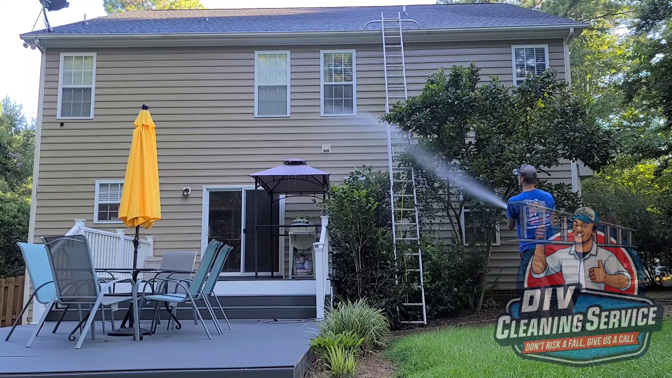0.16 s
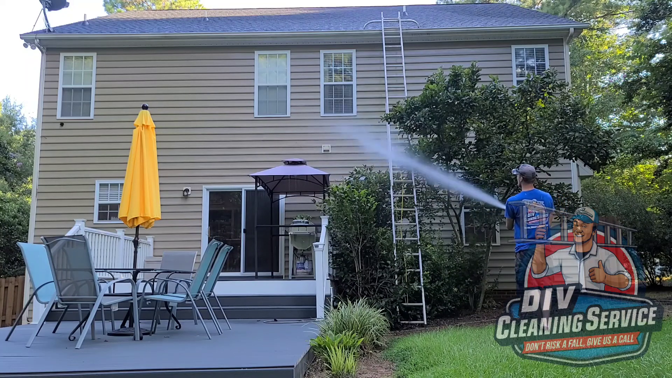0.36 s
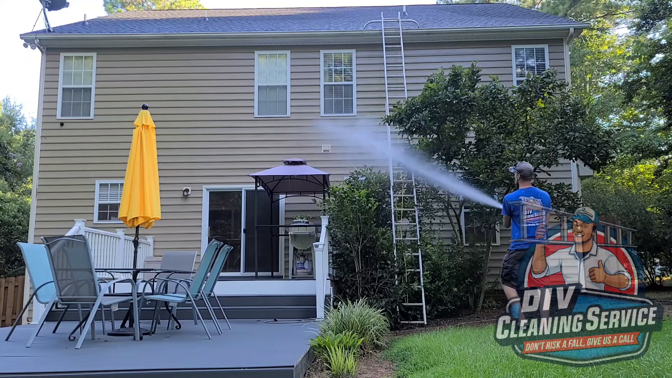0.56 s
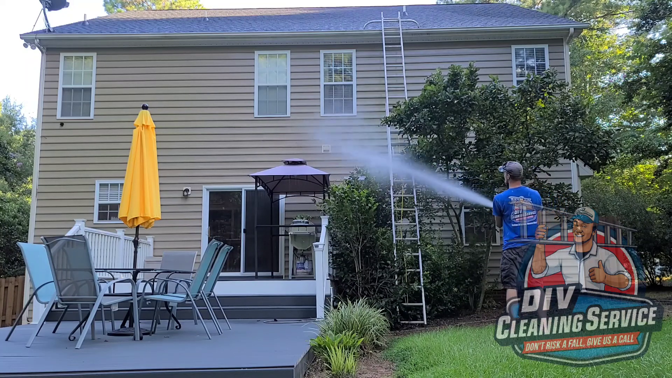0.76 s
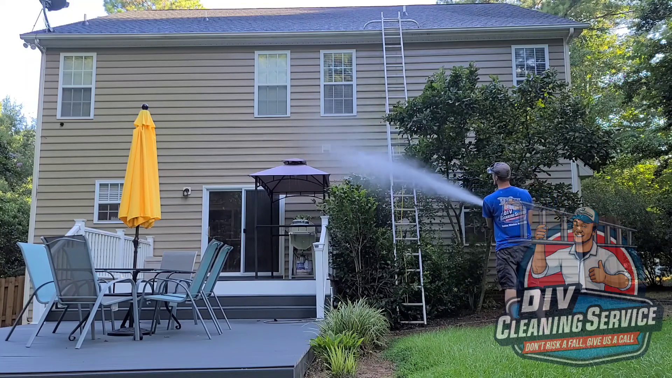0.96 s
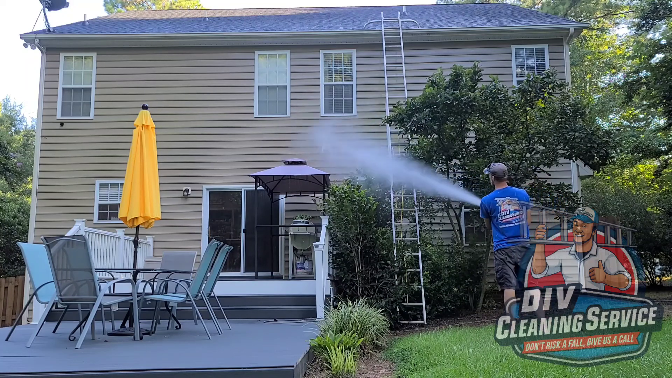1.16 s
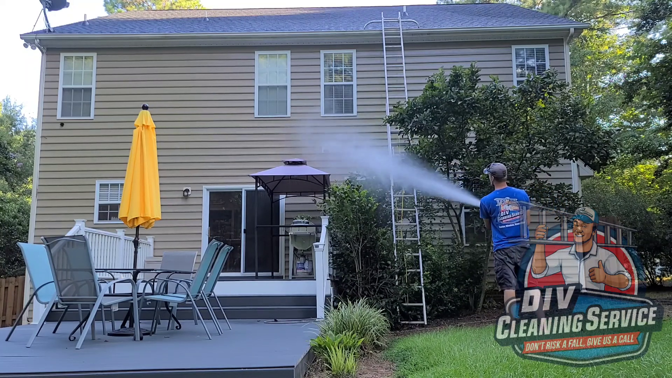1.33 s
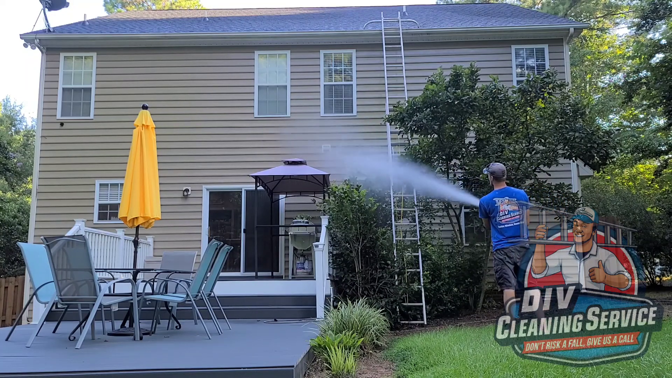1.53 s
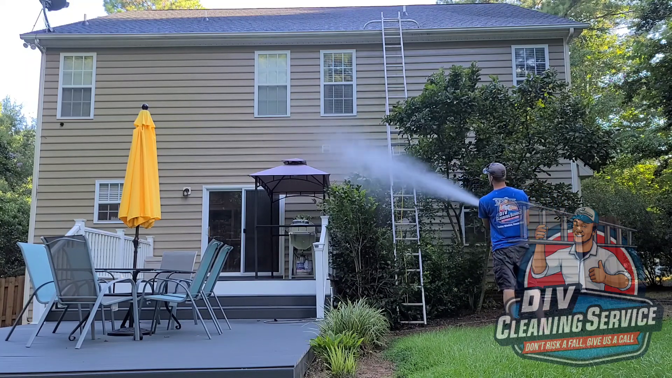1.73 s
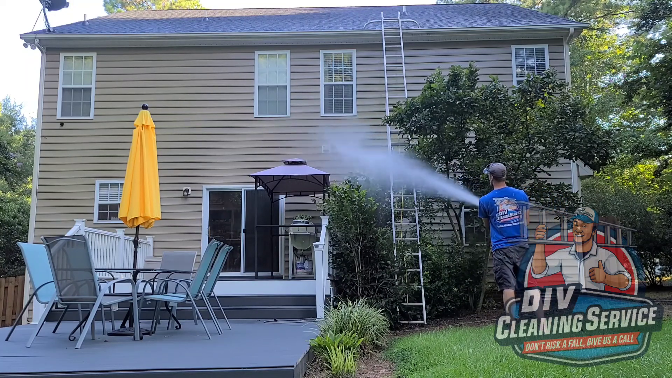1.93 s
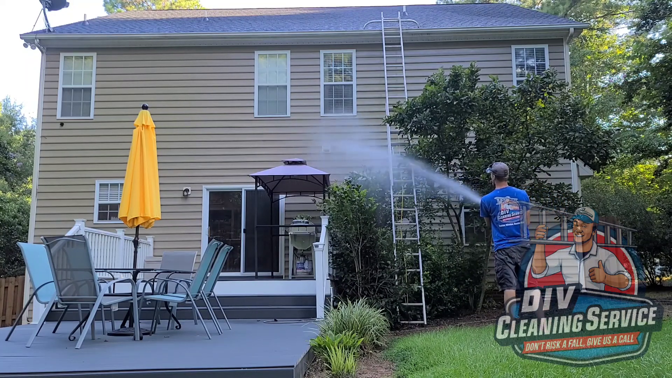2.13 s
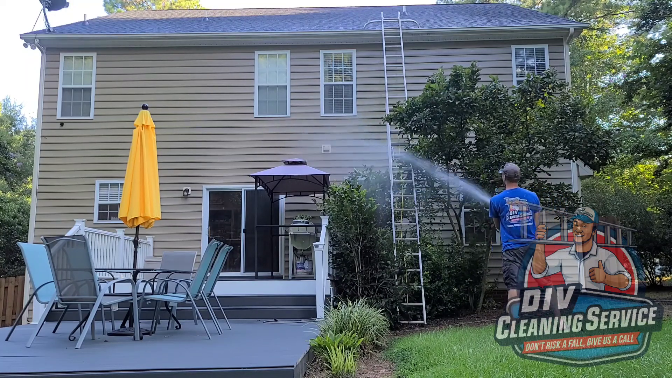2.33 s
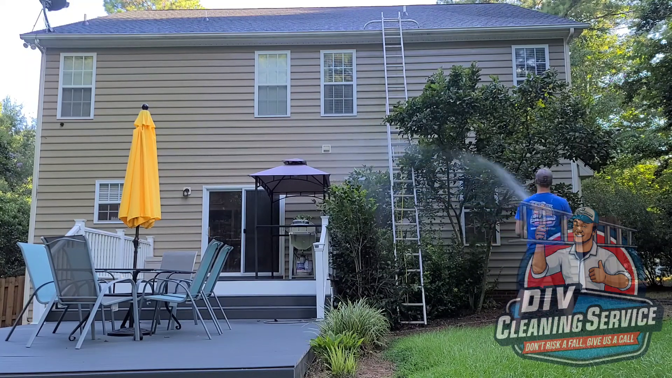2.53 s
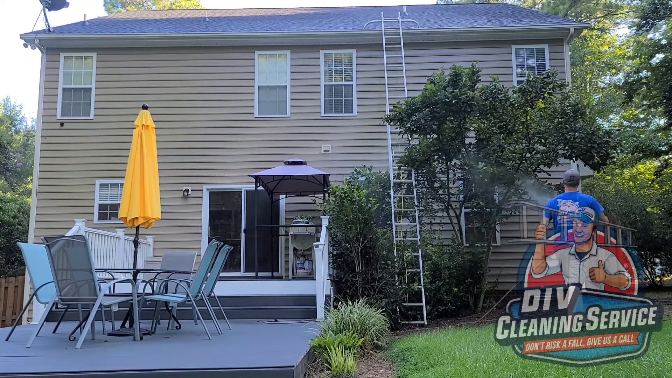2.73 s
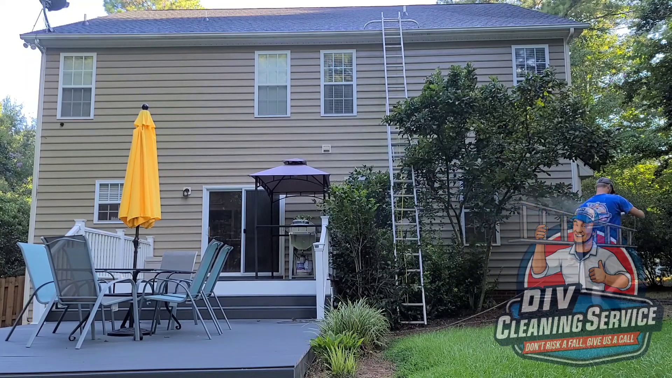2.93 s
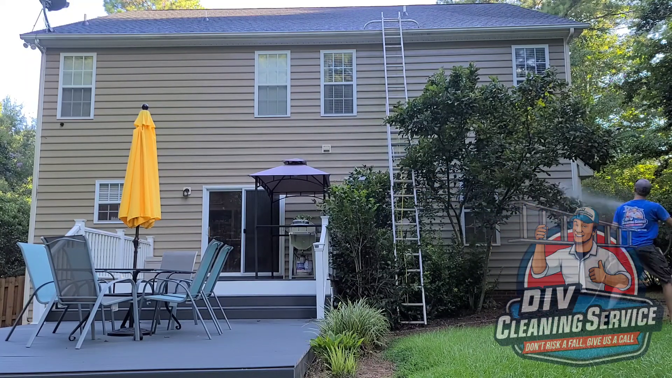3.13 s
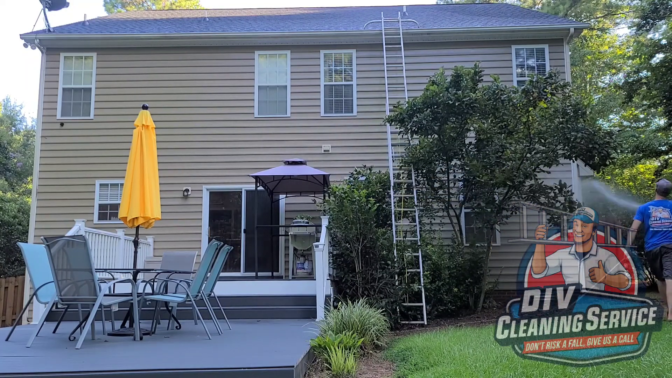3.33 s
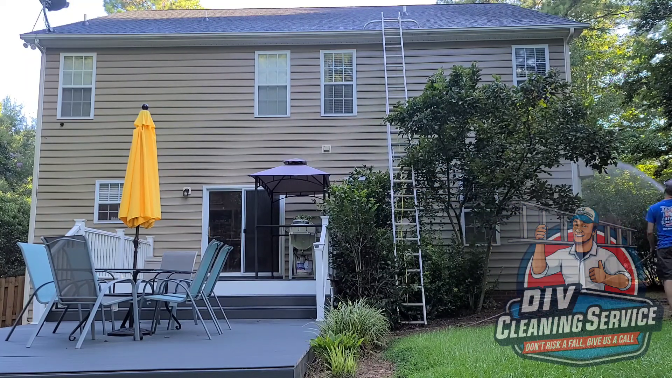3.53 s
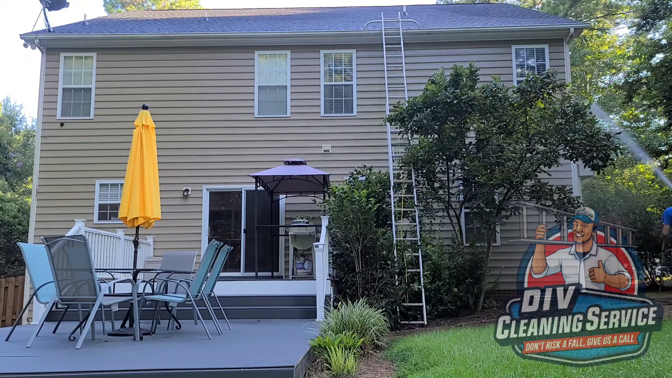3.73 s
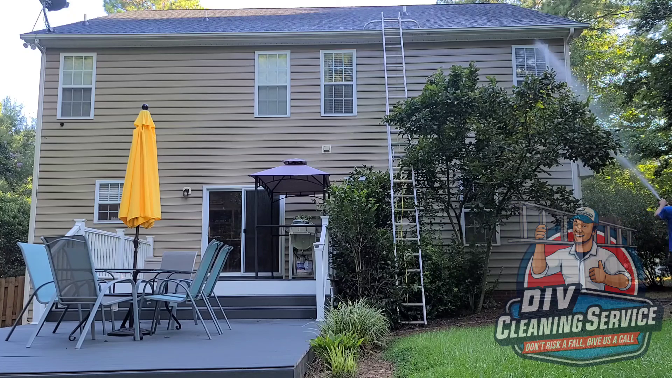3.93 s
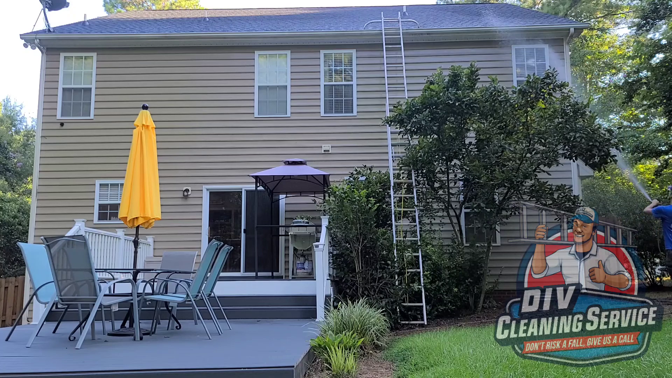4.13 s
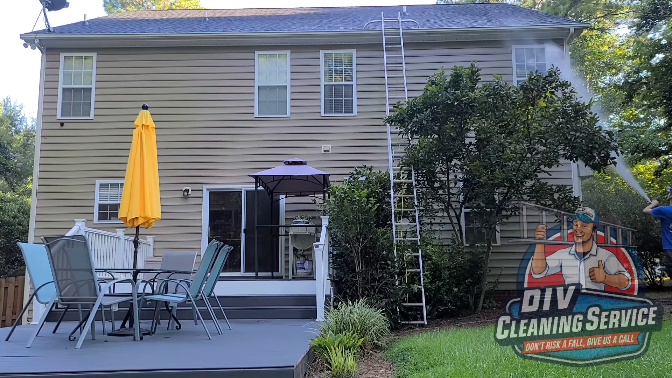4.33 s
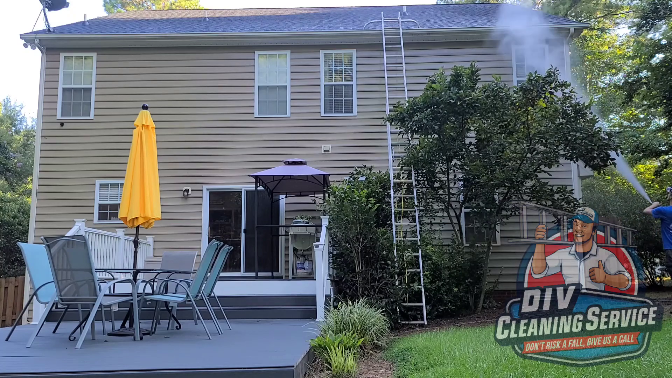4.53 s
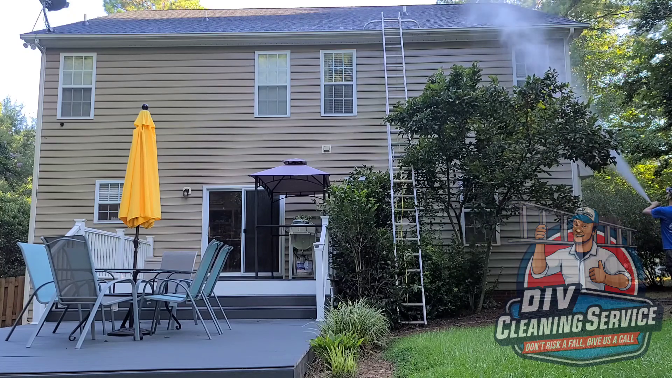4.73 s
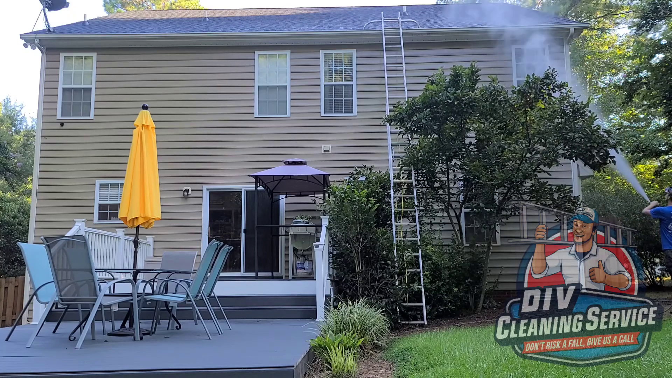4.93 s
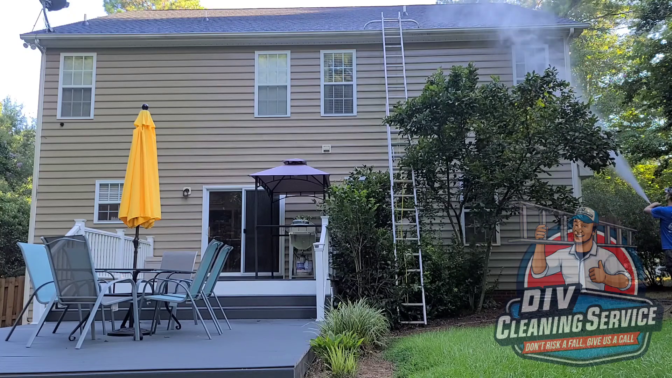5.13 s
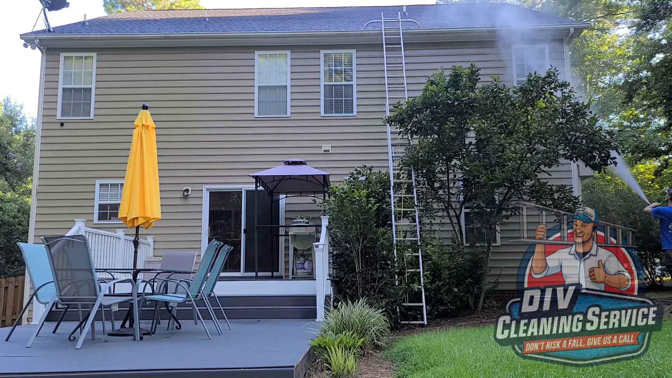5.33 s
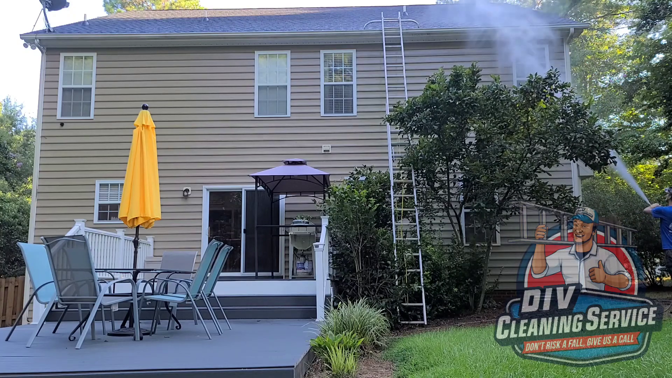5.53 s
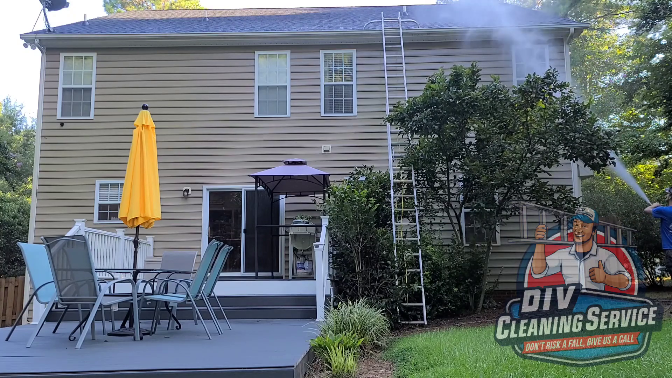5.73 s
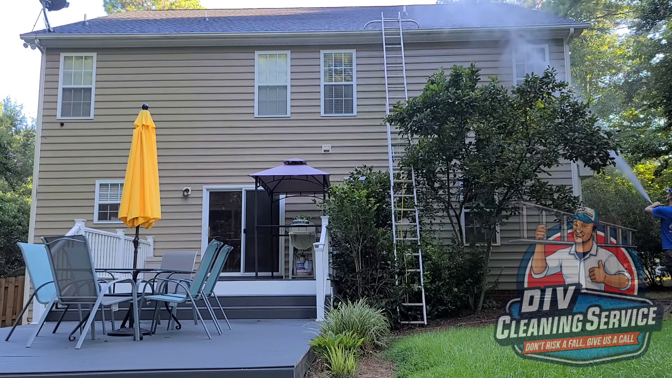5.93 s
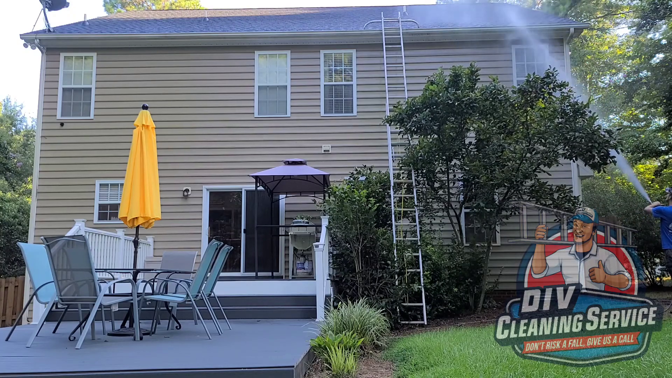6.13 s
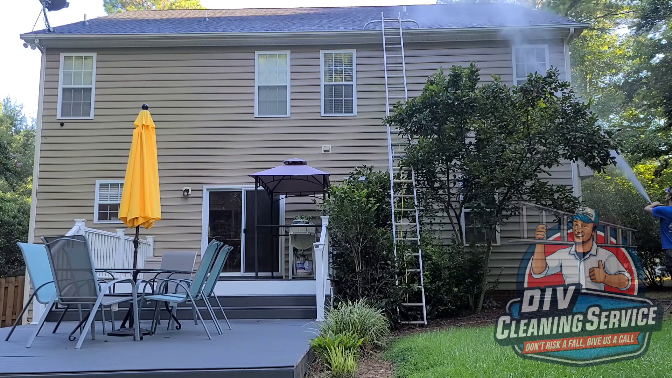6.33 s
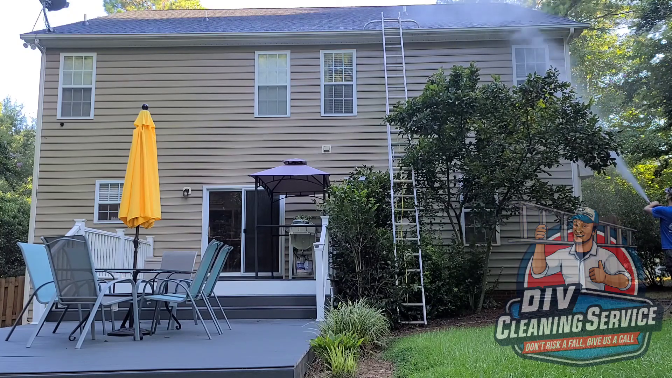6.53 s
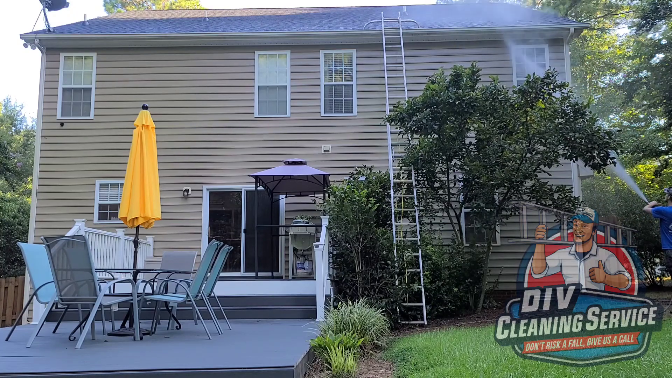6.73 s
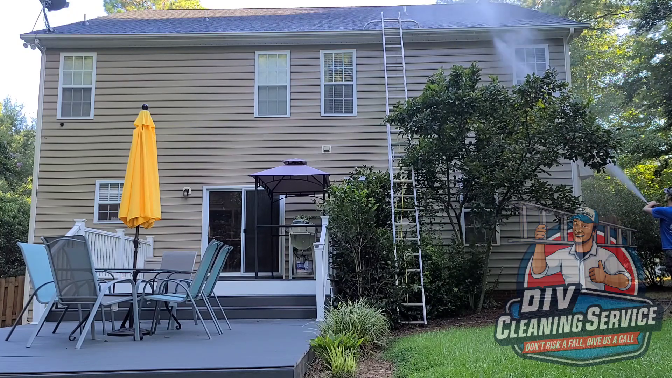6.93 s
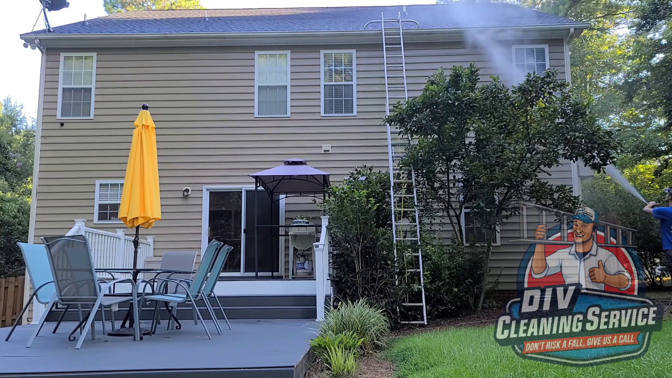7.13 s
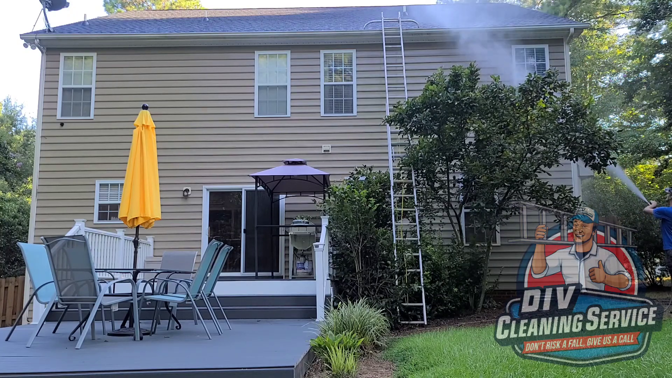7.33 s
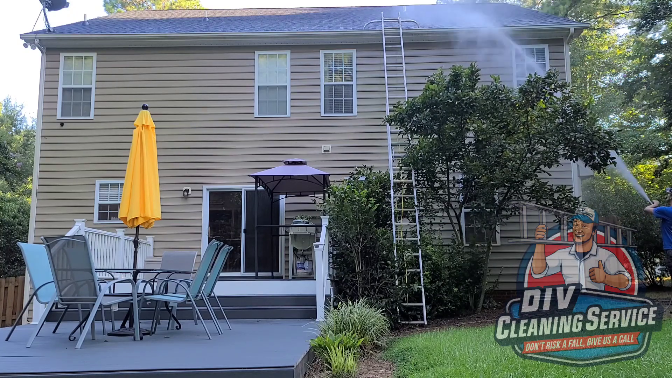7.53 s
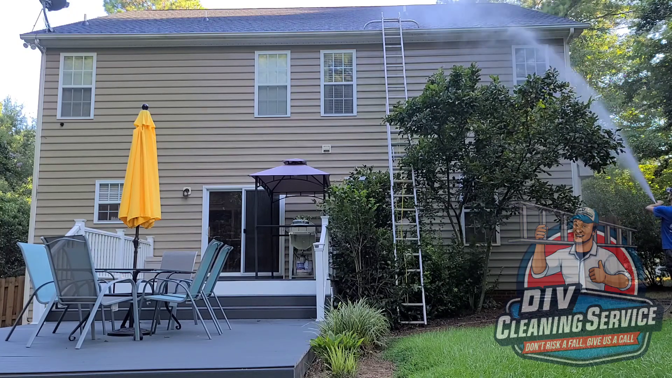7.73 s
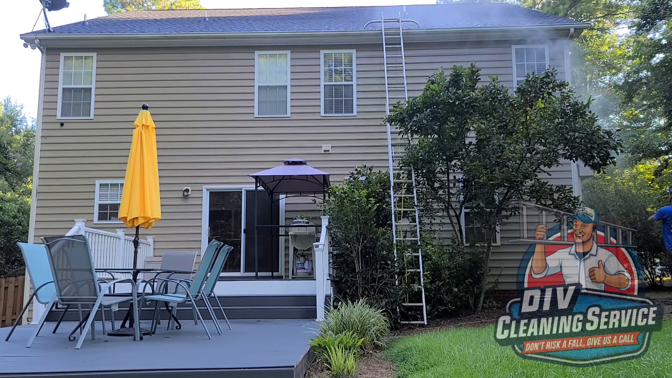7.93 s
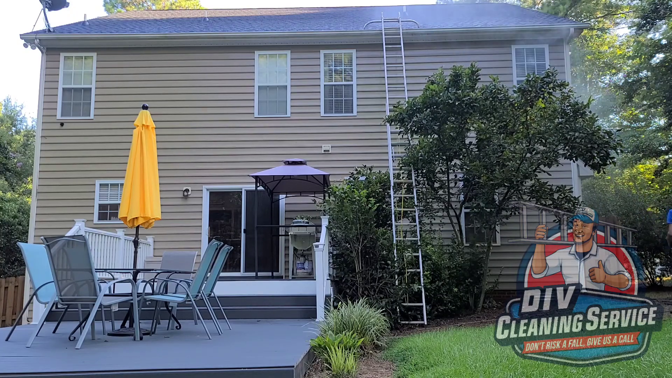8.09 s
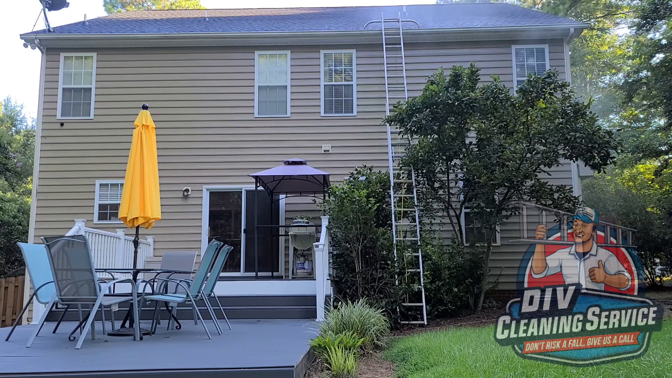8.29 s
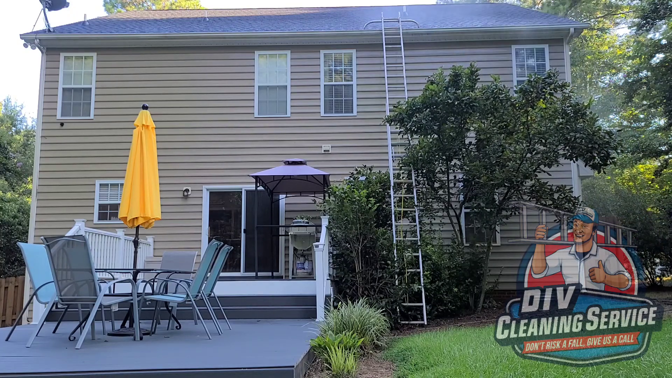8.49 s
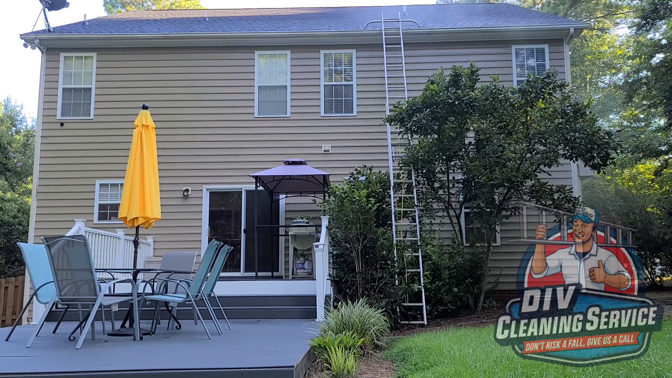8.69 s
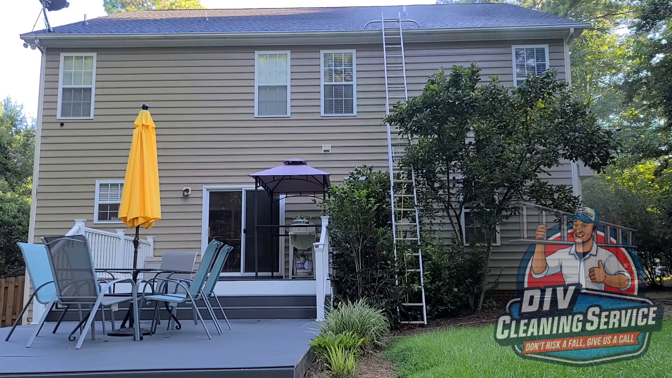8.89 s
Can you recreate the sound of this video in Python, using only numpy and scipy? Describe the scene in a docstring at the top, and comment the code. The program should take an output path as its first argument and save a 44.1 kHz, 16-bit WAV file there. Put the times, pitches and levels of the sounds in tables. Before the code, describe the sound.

A pressure washer hisses against a house wall, splashes louder under the eaves, then stops, over a low machine drone and insects.

```python
"""Pressure washer in a garden

A jet is swept over a house: the nozzle hisses, water drums on the siding, then splashes under the
eaves until the trigger is let go. The machine drones far off, insects sing, a few last drops fall.
Two microphone ports a hand apart hear the jet from the right. Water is grainy noise coloured by what
it strikes; the machine is low tones over a rumble; the insects are one narrow band of noise."""
import sys
import numpy as np
from scipy import signal
from scipy.fft import rfft, irfft, next_fast_len
from scipy.io import wavfile
from scipy.ndimage import uniform_filter1d, map_coordinates

SR = 44100
rng = np.random.default_rng(int(sys.argv[2]) if len(sys.argv) > 2 else 0)


def file_out(sig):
    """Save sig as 16-bit WAV at sys.argv[1]."""
    # one column per channel
    cols = np.atleast_2d(sig).T
    # limit, then scale
    lim = np.clip(cols, -1, 1)
    pcm = np.round(lim * 32767).astype(np.int16)
    wavfile.write(sys.argv[1], SR, pcm)


N = 399310
FRAME_SAMPLES = 512


def amp(db):
    """Decibels to gain."""
    return np.exp(np.asarray(db) * (np.log(10) / 20))


def unit(x):
    """Scale to rms 1."""
    return x / np.sqrt(np.mean(x ** 2) + 1e-20)


def along(points, hz):
    """Interpolate (freq_hz, value) points on a log axis."""
    freq_hz, values = np.transpose(points)
    return np.interp(np.log(hz + 1), np.log(freq_hz + 1), values)


def bumps(rows, hz):
    """Summed Gaussian lifts and dips, one curve per dB column."""
    centre_hz, width_hz, *db = np.transpose(rows)
    return np.array(db) @ np.exp(-.5 * ((hz - centre_hz[:, None]) / width_hz[:, None]) ** 2)


def curves(rows):
    """One value per sample for each column after the time."""
    time_s, *cols = np.transpose(rows)
    return [np.interp(np.arange(N) / SR, time_s, c) for c in cols]


def held(rows):
    """One gain per sample for each dB column: glide over the swing, then hold."""
    start_s, swing_s, *cols = np.transpose(rows)
    knots_s = np.ravel([start_s, start_s + abs(swing_s)], order="F")[1:]
    return [np.interp(np.arange(N) / SR, knots_s, np.repeat(amp(db / 2), 2)[:-1]) ** 2 for db in cols]


def bell(centre_s, width_s):
    """Gaussian rise and fall."""
    return np.exp(-.5 * ((np.arange(N) / SR - centre_s) / width_s) ** 2)


def wobble(rate_hz, t=None):
    """Smooth random curve, read at each sample or at times t."""
    t = np.arange(N) / SR if t is None else t
    return map_coordinates(rng.standard_normal(int(N * rate_hz / SR) + 4), [t * rate_hz])


def filtered(x, response):
    """Apply a frequency response."""
    size = next_fast_len(N + 8192)
    return irfft(rfft(x, size) * response(np.fft.rfftfreq(size, 1 / SR)), size)[..., :N]


def stereo_noise(share, colour):
    """Noise of rms 1; share is the power fraction common to both ports."""
    common, *own = rng.standard_normal((3, N))
    return unit(filtered(np.sqrt(share) * common + np.sqrt(1 - share) * np.array(own), colour))


def by_bearing(ahead, right, aside):
    """Blend two spectra over time; aside is 0 ahead, 1 far right."""
    return np.outer(ahead, 1 - aside) + np.outer(right, aside)


# Sound arriving straight, jet ahead or far right: freq_hz, share
DIRECT_AHEAD = [(300, .97), (700, .75), (1500, .85), (2300, .7), (2900, .8), (3500, .45), (4100, .6),
                (5500, .25), (15000, .15)]
DIRECT_RIGHT = [(300, .97), (700, .65), (1900, .82), (2900, .45), (3800, .4), (4800, .68), (7500, .55),
                (8800, .28), (10300, .7), (11500, .3), (12900, .9), (14300, .3), (15500, .5)]
# Extra lag from bending round the camera body: freq_hz, phase_rad
PHASE_AHEAD = [(700, -.2), (1000, .1), (1700, 0), (2300, -.9), (2700, .35), (3200, .2), (3700, -.6),
               (4200, 0)]
PHASE_RIGHT = [(600, -.3), (1100, 0), (1700, 0), (2500, -1), (3000, -.7), (3400, .2), (3900, -.7),
               (4700, -.5), (5800, .4), (7500, -.8), (8500, 0)]
# Shading by the body: freq_hz, left_minus_right_db
PORT_SHADE = [(700, .3), (2000, -.7), (2750, 3.5), (3400, 1.5), (4500, 1.5), (5400, 5.5), (6800, 4),
              (7500, -4), (8800, -1), (11000, -3.5), (12700, .5), (15300, -2.5)]
def reach_ports(spectra, hz, lag_us, aside, scatter):
    """Direct sound reaches the left port late; scattered sound differs at each port."""
    direct, scattered = spectra[0], spectra[1:]
    share = by_bearing(along(DIRECT_AHEAD, hz), along(DIRECT_RIGHT, hz), aside) ** scatter
    bend_rad = by_bearing(along(PHASE_AHEAD, hz), along(PHASE_RIGHT, hz), aside)
    lag_rad = 2 * np.pi * np.outer(hz, lag_us) / 1e6 + bend_rad
    straight = np.sqrt(share) * direct * np.exp([-.5j * lag_rad, .5j * lag_rad])
    shade_db = np.outer([.5, -.5], along(PORT_SHADE, hz))
    return (straight + np.sqrt(1 - share) * scattered) * amp(shade_db[..., None])


# Deck echo bands: centre_hz, width_hz, ahead_db, right_db
DECK_BANDS = [(470, 60, 0, 3), (800, 130, 0, -2.5), (1890, 150, 4.5, 4), (2250, 130, -3.5, -2),
              (2620, 170, 1, -3), (2900, 200, 2.5, 2), (3500, 220, -3, 0), (4650, 250, 1.5, 0),
              (4890, 110, 0, 1.5), (5150, 200, -1.5, 0)]
def deck_colour_db(hz, t, aside, sway=.03):
    """Echoes off the deck lift and thin bands that sway in pitch as the jet moves."""
    up = .5 + .5 * np.tanh(wobble(4, t))
    high_db = by_bearing(*bumps(DECK_BANDS, hz / (1 + sway)), aside)
    low_db = by_bearing(*bumps(DECK_BANDS, hz / (1 - sway)), aside)
    return up * high_db + (1 - up) * low_db


# Left port lag as the lance moves right: time_s, lag_us
JET_LAG = [(0, 122), (.8, 116), (1.1, 98), (2.1, 98), (2.55, 130), (2.95, 205), (3.4, 228), (4.3, 232),
           (7.9, 232)]
def spray(spectrum, scatter, grain_db, sputter_db, patchy_db):
    """Water noise of rms 1: dense drop impacts of uneven size, part direct, part scattered."""
    slugs = amp(sputter_db * wobble(60))  # the jet breaks up
    impacts = rng.standard_normal((3, N)) * amp(grain_db * rng.standard_normal((3, N))) * slugs
    hz, t, spectra = signal.stft(impacts, SR, nperseg=FRAME_SAMPLES)
    lag_us = np.interp(t, *np.transpose(JET_LAG))
    aside = (lag_us - lag_us.min()) / np.ptp(lag_us)
    ports = reach_ports(spectra, hz, lag_us, aside, scatter)
    patches = uniform_filter1d(rng.standard_normal(spectra.shape[1:]), 5, axis=0)
    patches = unit(uniform_filter1d(patches, 8, axis=1))
    colour_db = along(spectrum, hz)[:, None] + deck_colour_db(hz, t, aside) + patchy_db * patches
    ports = ports * amp(colour_db) * (hz > 220)[:, None]
    return unit(signal.istft(ports, SR, nperseg=FRAME_SAMPLES)[1][:, :N])


# Nozzle spectrum: freq_hz, level_db
NOZZLE_COLOUR = [(350, -7), (680, -11.5), (1000, -5), (1250, 0.5), (1600, 2.5), (1950, -1.5), (2400, -0.5),
                 (2880, -4.5), (4000, -7.5), (5500, -15.5), (7600, -17.5), (10300, -17.5), (13000, -15),
                 (15300, -14)]
def nozzle_hiss():
    """Water leaves the nozzle in a fine-grained hiss."""
    return spray(NOZZLE_COLOUR, scatter=1.5, grain_db=1.56, sputter_db=.72, patchy_db=.9)


# Hollow mode: freq_hz, level_db
RING_COLOUR = [(1300, -30), (1650, -9), (1830, -1), (1980, 0), (2150, -10), (2500, -30)]
def hollow_ring():
    """The struck surface rings in one broad mode near 2 kHz."""
    return spray(RING_COLOUR, scatter=.34, grain_db=-4.5, sputter_db=2, patchy_db=0)


# Siding spectrum: freq_hz, level_db
SIDING_COLOUR = [(350, -14), (680, -15.5), (1000, -4.5), (1250, -7.5), (1600, -3.5), (1950, 0.6),
                 (2400, 0.5), (2880, -1.5), (4000, -6), (5500, -11), (7600, -14), (10300, -17.5),
                 (13000, -17.5), (15300, -23.5)]
def siding_drum():
    """Drops drum on the siding."""
    return spray(SIDING_COLOUR, scatter=1.23, grain_db=2.5, sputter_db=.68, patchy_db=.6)


# Splash spectrum: freq_hz, level_db
EAVES_COLOUR = [(350, -9.5), (680, -15.5), (1000, -8), (1250, -2.5), (1600, 2), (1950, -1.5), (2400, 3.5),
                (2880, -3.5), (4000, -1.5), (5500, -2.5), (7600, -5), (10300, -10), (13000, -11),
                (15300, -14)]
def eaves_splash():
    """Water splashes under the eaves, coarse and bright."""
    return spray(EAVES_COLOUR, scatter=1, grain_db=4.5, sputter_db=.67, patchy_db=1.75)


# Swish spectrum: freq_hz, level_db
SWISH_COLOUR = [(900, -30), (1100, -6), (1250, 0), (1500, -2), (1900, -4), (2200, -10), (2700, -30)]
def air_swish():
    """The jet swishes through open air."""
    return spray(SWISH_COLOUR, scatter=.8, grain_db=1.5, sputter_db=1, patchy_db=1)


# Mist spectrum: freq_hz, level_db
MIST_COLOUR = [(3000, -30), (6000, -6), (9000, 2), (12000, 5), (15300, -7)]
def mist_fizz():
    """Fine mist fizzes in the high treble."""
    return spray(MIST_COLOUR, scatter=2.5, grain_db=2, sputter_db=2.5, patchy_db=2.5)


# Lance aims: start_s, swing_s, nozzle_db, siding_db, eaves_db, ring_db, mist_db, swish_db
LANCE_AIMS = [(0, 0, -33.5, -44, -62, -36.5, -65, -70), (.24, 0.15, -29.5, -33.5, -60, -57, -59, -70),
              (.84, 0.17, -31, -26, -35, -49, -60, -70), (1.86, 0.14, -36.5, -30, -61, -44, -64, -70),
              (2.03, 0.11, -37.5, -50, -66, -60, -66, -43), (2.3, 0.0047, -35.5, -61, -64, -62, -53, -51),
              (2.58, 0.27, -36, -49, -43.5, -55, -53, -46.5), (3.18, 0.19, -36, -56, -62, -55, -53, -39.5),
              (4.12, 0.064, -35, -38, -40, -52.5, -57, -57), (4.2, 0.12, -30, -28, -27.5, -33, -54, -56),
              (4.34, 0.043, -38, -30, -21, -25, -46, -70), (4.64, 0.14, -37, -35, -21.5, -44, -32, -70),
              (4.85, 0.16, -31.5, -40, -23, -42, -32, -70), (5.26, 0.1, -29.5, -26, -24, -27.5, -33, -65),
              (5.42, 0.28, -32, -30.5, -47, -38, -52, -70), (6.9, 0.077, -34.5, -30, -39, -53, -47, -71.5)]
# Quick flicks in open air: centre_s, mist_db, swish_db
LANCE_FLICKS = [(2.48, -62, -37.5), (2.66, -50, -53), (3.03, -48, -40)]
def jet(flick_width_s=.078, release_s=7.771, decay_db_per_s=644):
    """Each aim sets the mix of water sounds; releasing the trigger stops the flow."""
    nozzle, siding, eaves, ring, mist, swish = held(LANCE_AIMS)
    for centre_s, mist_db, swish_db in LANCE_FLICKS:
        flick = bell(centre_s, flick_width_s)
        mist += amp(mist_db) * flick
        swish += amp(swish_db) * flick
    hiss = nozzle * nozzle_hiss()
    struck = siding * siding_drum() + eaves * eaves_splash() + ring * hollow_ring()
    airborne = mist * mist_fizz() + swish * air_swish()
    flow = amp(-decay_db_per_s * np.clip(np.arange(N) / SR - release_s, 0, None))
    return flow * (hiss + struck + airborne)


# Echoes off walls, rails and boards: delay_ms, level_db
EARLY_ECHOES = [(3.7, -29), (4.6, -14.5), (5.6, -18.5), (6.9, -19.5), (8.4, -13.5), (10.5, -22), (13, -15)]
# Bands shifting as the jet slides along the house: start_s, length_s, from_hz, to_hz, width_hz, gain_db
SLIDING_BANDS = [(1.935, 0.21, 3100, 1850, 260, 7.5), (2.33, .36, 650, 800, 260, 5.5),
                 (2.72, 0.65, 750, 750, 280, -2.5), (3.5, .68, 800, 900, 250, -2.5),
                 (2.9, .22, 2200, 2200, 900, 1), (3.62, 0.51, 2900, 3100, 350, 2.5),
                 (4.125, .24, 3600, 4200, 900, 3), (4.4, .45, 2480, 2660, 80, -13),
                 (4.72, .58, 2560, 2200, 85, -13), (4.68, .36, 2150, 1400, 100, -7),
                 (4.8, .7, 7200, 7000, 1200, 1), (5.75, 1, 3300, 3300, 600, -1.5),
                 (6.7, 0.19, 1900, 1840, 170, 2.5), (6.75, .7, 2950, 3250, 220, 1.5),
                 (6.95, .28, 1900, 1900, 200, -2), (7.25, .45, 1800, 1950, 130, 1.5)]
def near_reflections(x, wander_us=95, port_gap_us=40, cutoff_hz=1100):
    """Drifting early echoes comb the water sound; broader lifts and dips glide through it."""
    frames = dict(nperseg=4 * FRAME_SAMPLES, noverlap=3 * FRAME_SAMPLES)
    hz, t, spectra = signal.stft(x, SR, **frames)
    hz = hz[:, None]
    delayed = lambda delay_s: np.exp(-2j * np.pi * hz * delay_s)
    low_cut = (hz / np.hypot(hz, cutoff_hz)) ** 2  # rails and boards are too small to return bass
    comb, lift_db = 1, np.zeros(spectra.shape[1:])
    for delay_ms, level_db in EARLY_ECHOES:
        delay_s = delay_ms / 1000 + wander_us * wobble(1.198, t) / 1e6
        gap_s = port_gap_us * rng.standard_normal((2, 1, 1)) / 1e6
        comb = comb + amp(level_db) * low_cut * delayed(delay_s + gap_s)
    for start_s, length_s, from_hz, to_hz, width_hz, gain_db in SLIDING_BANDS:
        active = (t > start_s) & (t < start_s + length_s)
        progress = (t[active] - start_s) / length_s
        centre_hz = from_hz + (to_hz - from_hz) * progress
        band = np.exp(-.5 * ((hz - centre_hz) / width_hz) ** 2)
        lift_db[:, active] += gain_db * np.sqrt(np.sin(np.pi * progress)) * band
    return signal.istft(spectra * comb * amp(lift_db), SR, **frames)[1][:, :N]


def yard_echo(x, t60_s, cutoff_hz):
    """Walls and trees return a dull, scattered echo."""
    t = np.arange(SR // 2) / SR
    tail = rng.standard_normal((2, len(t))) * amp(-60 * t / t60_s) * (t > .02)
    echo = signal.fftconvolve(x, tail / np.linalg.norm(tail[0]), axes=1)[:, :N]
    return filtered(echo, lambda hz: 1 / (1 + 1j * hz / cutoff_hz) ** 2)


def hum(pitch_hz, level_db, drift_hz, shake_db):
    """Unsteady sine, alike at both ports."""
    phase = 2 * np.pi * np.cumsum(pitch_hz + drift_hz * wobble(9)) / SR
    return np.sqrt(2) * amp(level_db + shake_db * wobble(13)) * np.sin(phase)


# Machine under load: time_s, shaft_hz, rumble_db, shaft_db
MACHINE_RUN = [(0.0, 51.3, -39.5, -42), (0.4, 55.0, -39.5, -42), (1.01, 52.5, -39.5, -41),
               (1.35, 56, -38, -40), (1.69, 58.3, -37, -42), (1.94, 50.4, -35.5, -39),
               (2.14, 54.6, -37.5, -41), (4.06, 54.0, -38, -43), (4.31, 59.9, -38, -41.5),
               (4.99, 52.9, -39, -39), (5.8, 56, -39, -42.5), (6.73, 57.3, -38, -42.5),
               (6.98, 53.4, -38.5, -41.5), (7.96, 53.9, -38.5, -40), (8.09, 58.7, -39.5, -39),
               (8.7, 57.76, -42, -38.5), (9.05, 56.9, -44, -42.5)]
# Rumble spectrum: freq_hz, level_db
RUMBLE_COLOUR = [(8, -18), (25, -11), (45, -4), (65, 0), (95, -2), (118, -1.5), (155, -2.5), (195, -10.5),
                 (245, -10.5), (285, -16), (330, -24), (480, -30), (700, -80)]
# Second hum: centre_s, width_s, pitch_hz, level_db
HUM_SWELLS = [(1.22, .1, 136, -41.5), (1.45, 0.09, 118, -37.5), (1.7, .1, 136, -41.5),
              (3.1, 0.13, 118, -43), (3.86, 0.15, 113, -39), (4.27, 0.06, 104, -40), (5.17, .07, 108, -41)]
def machine():
    """The shaft hum wavers with the load over a broad rumble; a second hum swells now and then."""
    shaft_hz, rumble_db, shaft_db = curves(MACHINE_RUN)
    rumble_gain = amp(rumble_db + .63 * wobble(12))
    rumble = rumble_gain * stereo_noise(.97, lambda hz: amp(along(RUMBLE_COLOUR, hz)))
    shaft = hum(shaft_hz, shaft_db, drift_hz=2.2, shake_db=2)
    swell_gain = sum(amp(db) * bell(centre_s, width_s) for centre_s, width_s, _, db in HUM_SWELLS)
    swell_hz = curves(HUM_SWELLS)[1]
    return shaft + swell_gain * hum(swell_hz, 0, drift_hz=2.13, shake_db=1.5) + rumble


# Chorus spectrum: freq_hz, level_db
INSECT_COLOUR = [(6200, -30), (6500, -10), (6750, -3), (6950, 0), (7200, -3), (7500, -11), (8000, -19),
                 (8600, -30)]
# Chorus swell: time_s, level_db
INSECT_SWELL = [(0, -57), (2.9, -56), (3.6, -53), (7.8, -54.5), (9.05, -54)]
def insects():
    """A chorus trills in one band near 7 kHz."""
    chorus = stereo_noise(.05, lambda hz: amp(along(INSECT_COLOUR, hz)) * (abs(hz - 7400) < 1200))
    trill_db = .7 * wobble(14) + 1.5 * wobble(50)
    return amp(curves(INSECT_SWELL)[0] + trill_db) * chorus


# Leaf and air spectrum: freq_hz, level_db
AIR_COLOUR = [(300, 4.5), (500, 0), (700, 0), (1100, 1), (1600, 0.5), (2400, 3), (3200, -1.5), (4200, -3),
              (5200, -5.5), (6200, -6), (8500, -10), (10300, -9), (12500, -8), (15300, -11)]
def garden_air(level_db=-50):
    """Far leaves and air rustle, coloured by the deck."""
    colour_db = lambda hz: along(AIR_COLOUR, hz) + .8 * bumps(DECK_BANDS, hz).mean(0)
    air = stereo_noise(.27, lambda hz: amp(colour_db(hz)) * (hz > 220))
    air[0] = np.roll(air[0], shift=11)  # from the right: the left port lags
    rustle_db = .25 * wobble(6) + .7 * wobble(45)
    return amp(level_db + rustle_db) * air


# Late drops: start_s, level_db
LAST_DROPS = [(8.0594, -39), (8.2664, -43), (8.7393, -36.5)]
def last_drops(attack_s=.001, t60_s=.021, low_cut_hz=3500):
    """Each drop lands as a short bright tick, nearer the right port."""
    ticks = np.zeros((2, N + SR))
    t = np.arange(SR // 40) / SR
    envelope = amp(-60 * t / t60_s) * (1 - np.exp(-t / attack_s))
    pan = amp([[-2.5], [1.5]])
    for start_s, level_db in LAST_DROPS:
        start = round(start_s * SR)
        ticks[:, start:start + len(t)] += amp(level_db) * pan * envelope * rng.standard_normal((2, len(t)))
    return filtered(ticks[:, :N], lambda hz: 1j * hz / (low_cut_hz + 1j * hz))


def scene():
    """All sources at the two ports."""
    water = amp(-.82) * near_reflections(jet())
    echo = amp(-15.5) * yard_echo(water, t60_s=.99, cutoff_hz=5000)
    return water + echo + machine() + insects() + garden_air() + last_drops()


# Microphone treble ripple: centre_hz, width_hz, gain_db
MIC_RIPPLE = [(10300, 300, -1.5), (12800, 600, -1.5), (15300, 700, 3)]
BAND_LIMIT_HZ = 15830
def record(dry):
    """The microphones colour the treble; nothing passes above the band limit."""
    return filtered(dry, lambda hz: amp(bumps(MIC_RIPPLE, hz)[0]) * (hz < BAND_LIMIT_HZ))


dry = scene()
out = record(dry)
file_out(out)
```